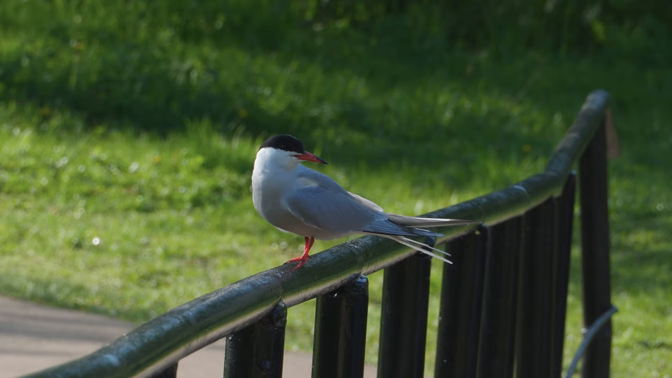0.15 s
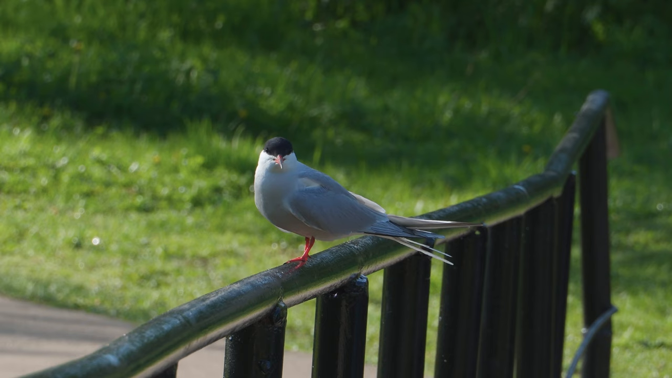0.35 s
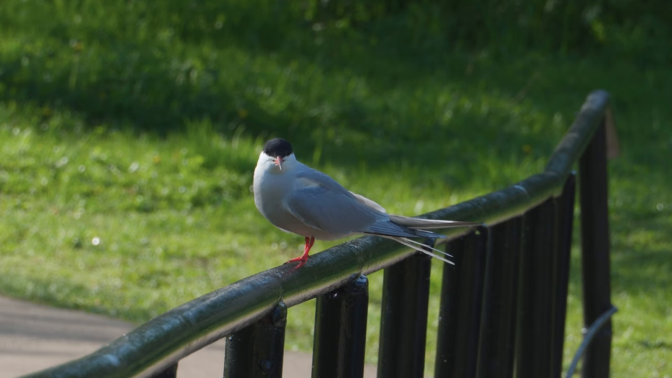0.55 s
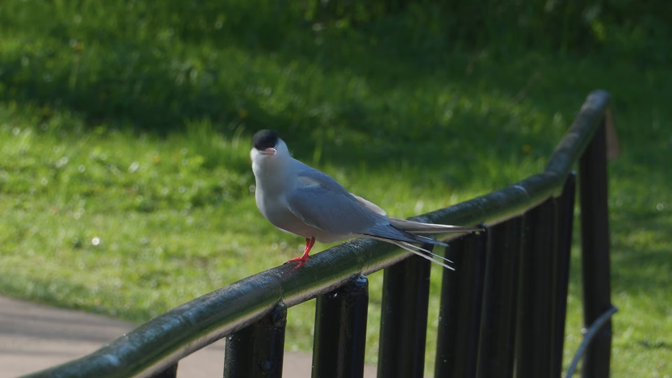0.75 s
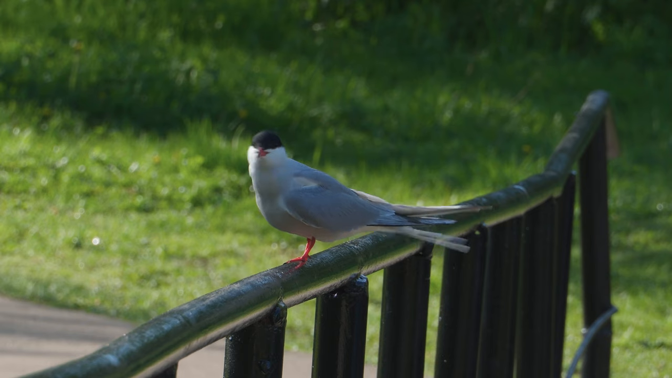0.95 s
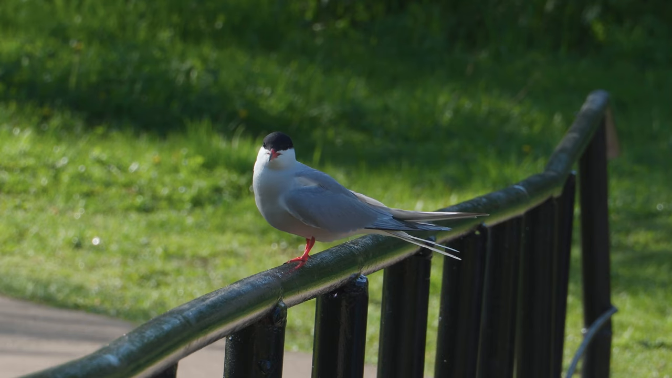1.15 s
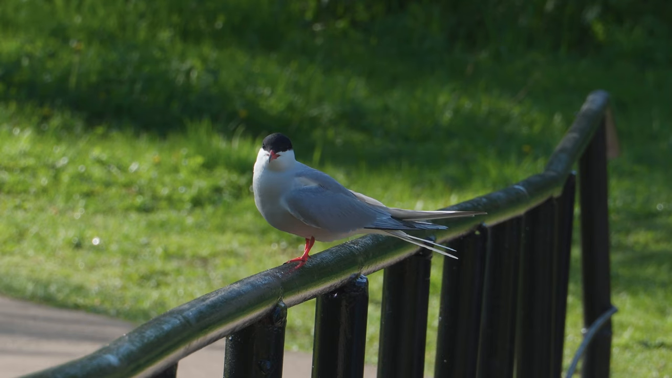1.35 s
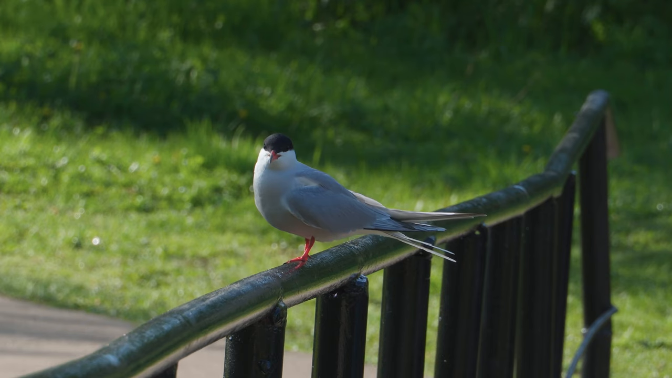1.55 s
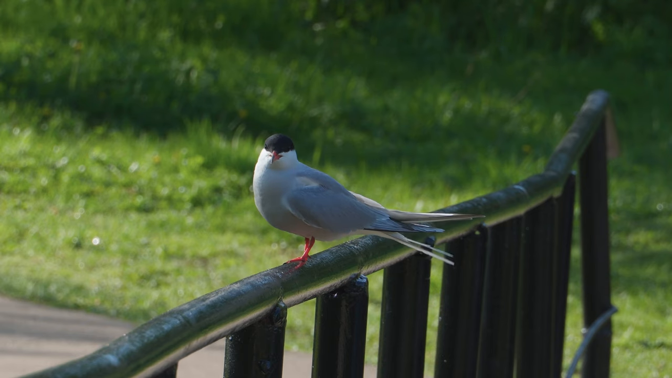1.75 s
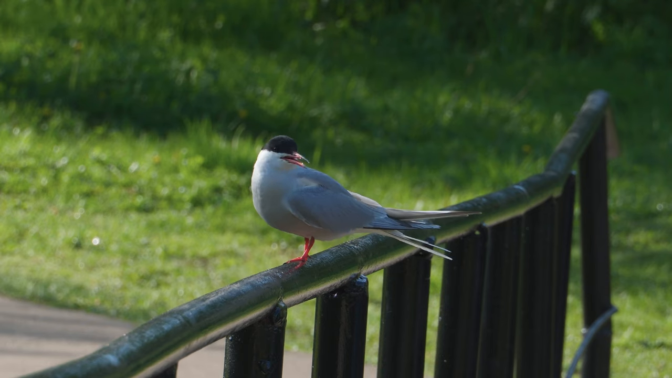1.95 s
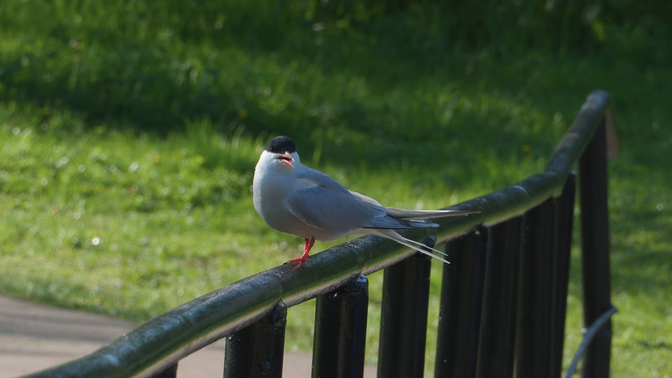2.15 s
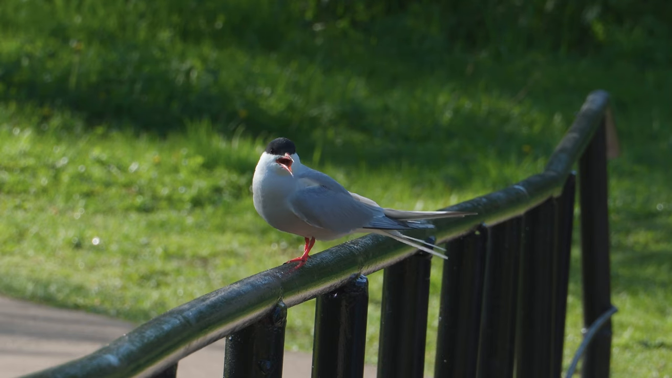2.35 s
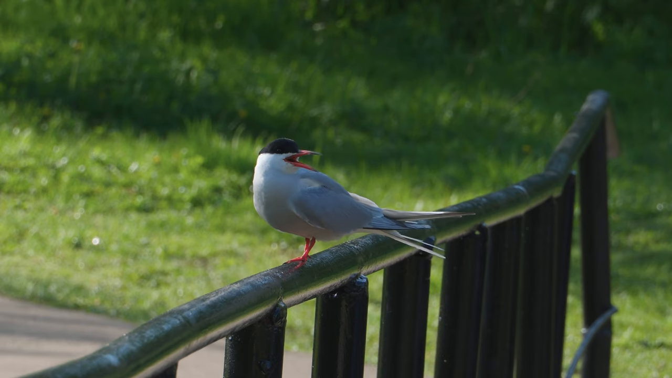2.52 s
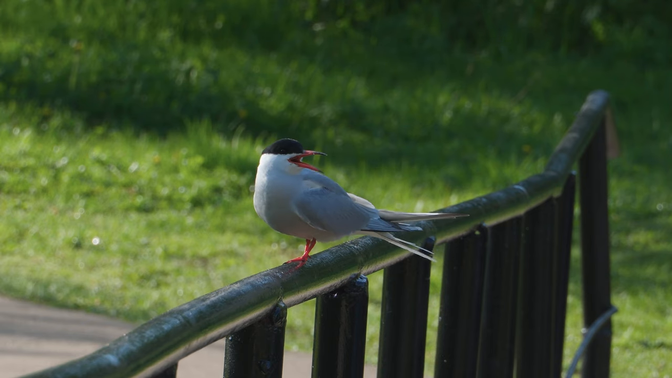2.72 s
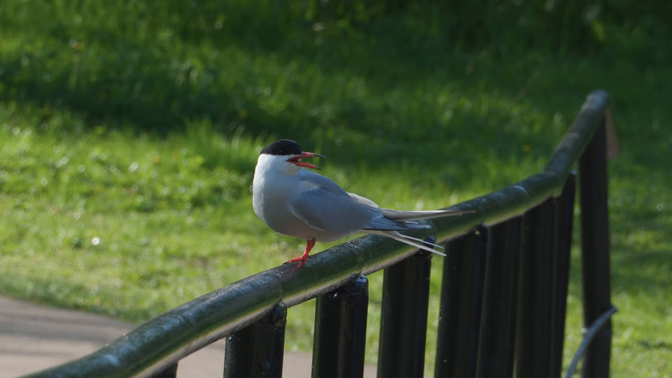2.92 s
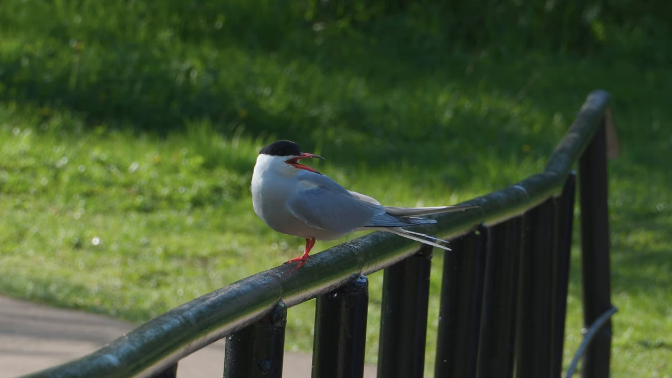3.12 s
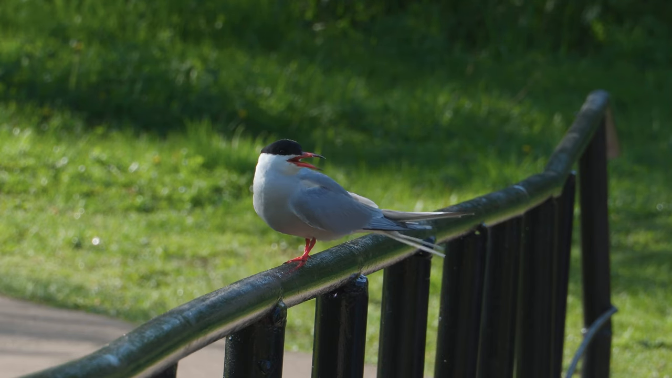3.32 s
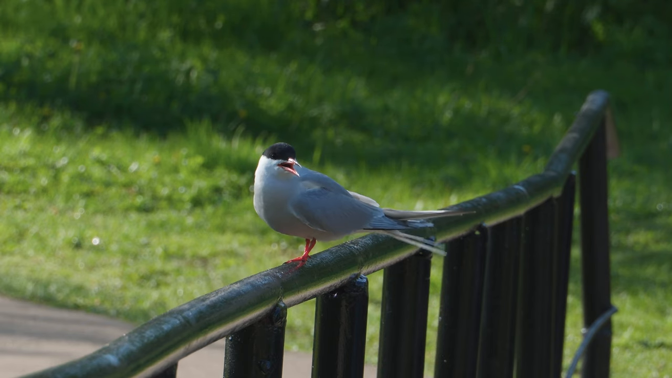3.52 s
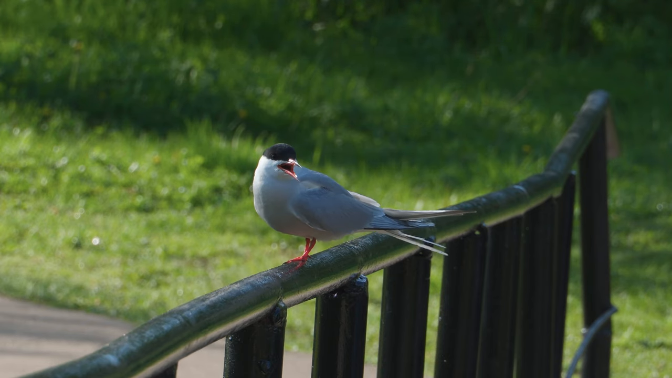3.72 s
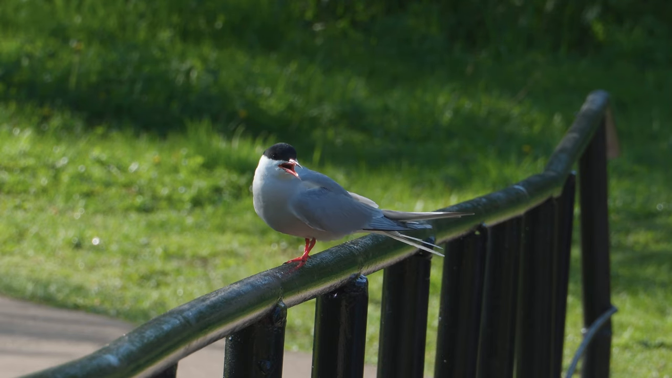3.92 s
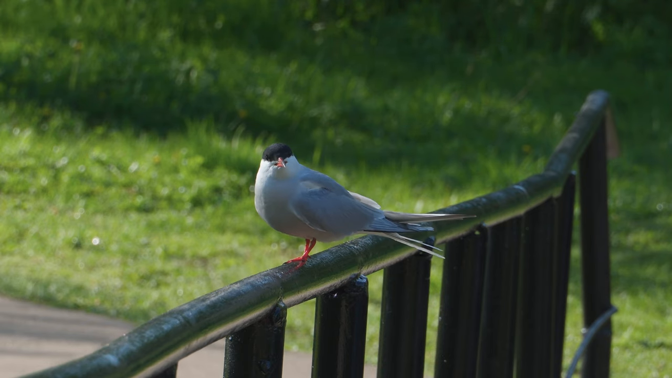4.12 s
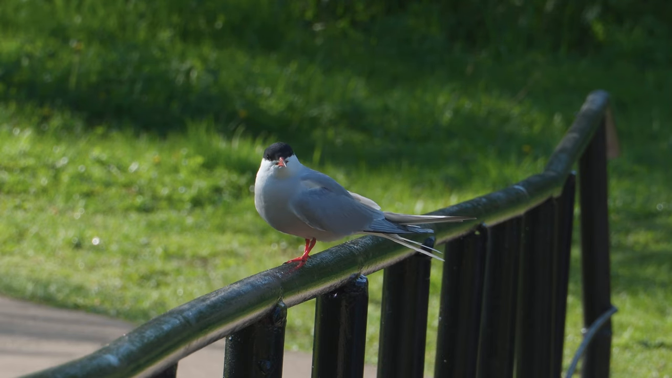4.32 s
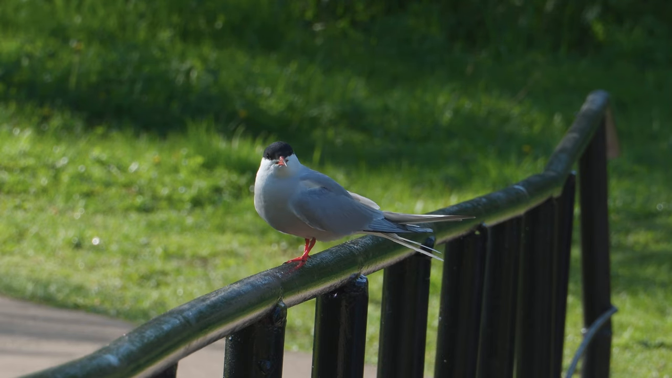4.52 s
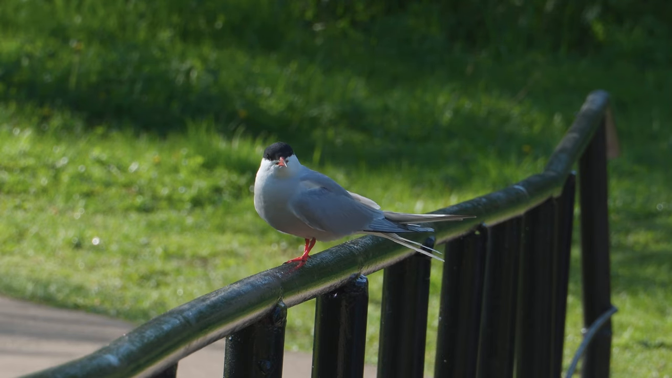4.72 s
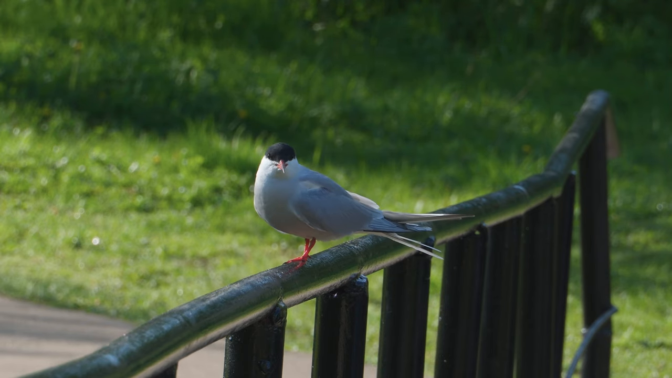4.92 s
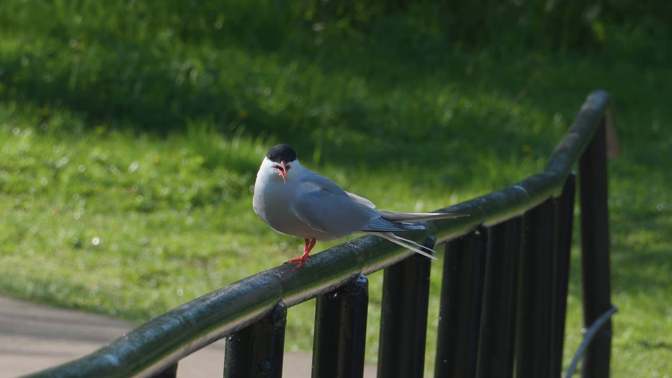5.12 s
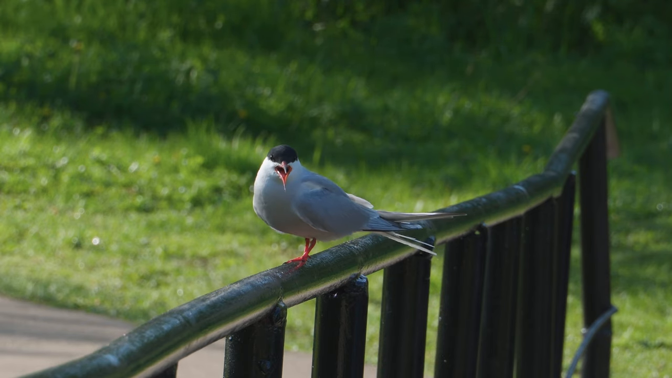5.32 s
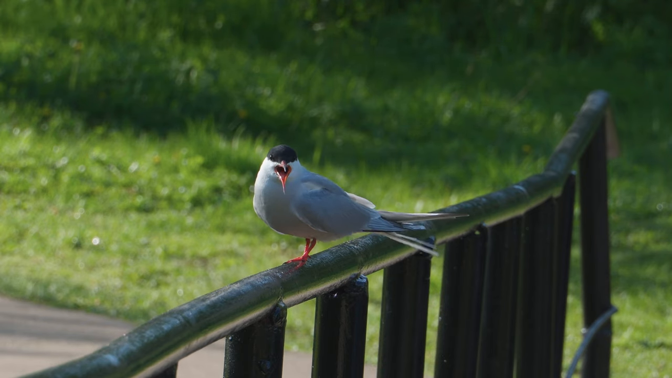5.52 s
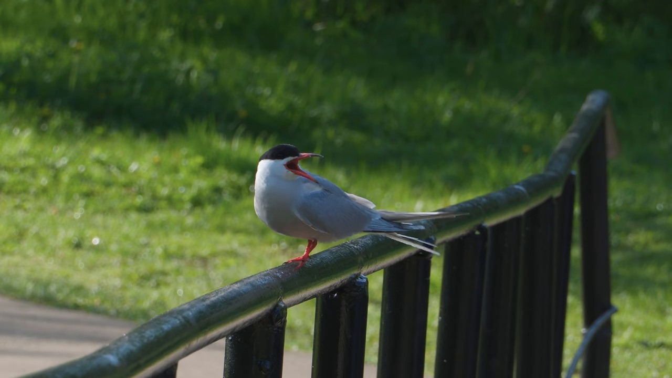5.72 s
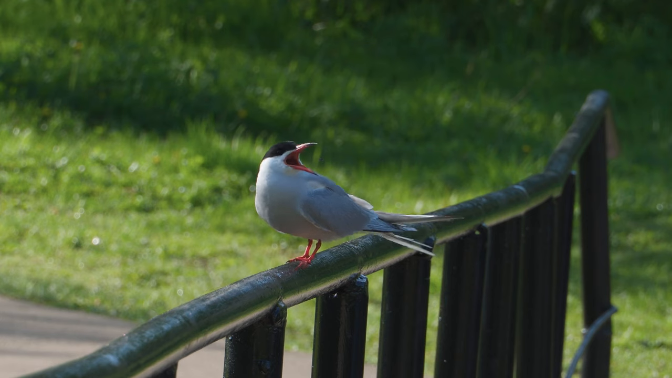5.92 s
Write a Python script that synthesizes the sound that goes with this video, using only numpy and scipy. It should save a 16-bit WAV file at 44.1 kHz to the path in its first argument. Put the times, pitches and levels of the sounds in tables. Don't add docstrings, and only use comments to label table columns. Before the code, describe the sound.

Quiet waterside park: gentle lapping with small plops and ticking droplets, steady hiss and faint low hum, a distant warbler and blurred twitter. After two seconds a close tern breaks into rapid harsh chatter, each throbbing rasp cracking into a short falling yelp, about seven a second. It stops at four seconds, leaving water, then a second bout starts and grows louder to the end. Fairly close microphone, light open-air echo.

```python
import sys
import numpy as np
from scipy import signal
from scipy.fft import rfft, irfft
from scipy.io import wavfile
from scipy.ndimage import uniform_filter1d, map_coordinates

SR = 44100
rng = np.random.default_rng(int(sys.argv[2]) if len(sys.argv) > 2 else 0)


def rack_gain(trim_db):
    fader = np.asarray(trim_db, float)
    return 10 ** (fader / 20)


def materialize(psi):
    bounded = np.clip(np.atleast_2d(psi).T, -1, 1)
    quanta = np.round(bounded * 32767).astype(np.int16)
    wavfile.write(sys.argv[1], SR, quanta)


N = 267246
TIME = np.arange(N) / SR
TOP_HZ = 15830


def unit(x):
    return x / np.sqrt(np.mean(x ** 2) + 1e-20)


def along(points, hz):
    f, v = np.transpose(points)
    return np.interp(np.log(hz + 1), np.log(f + 1), v)


def wobble(rate, size=N):
    knots = rng.standard_normal(int(size * rate / SR) + 4)
    return map_coordinates(knots, [np.arange(size) * rate / SR])


def rush(spectrum, patchy_db):
    hz, _, z = signal.stft(rng.standard_normal(N + 512), SR, nperseg=512)
    field = uniform_filter1d(rng.standard_normal(z.shape), size=5, axis=0)
    field = uniform_filter1d(field, size=6, axis=1)
    z = z * rack_gain(patchy_db * unit(field) + along(spectrum, hz)[:, None])
    return unit(signal.istft(z, SR, nperseg=512)[1][:N])


def add(track, s, sound):
    part = track[round(s * SR):][:len(sound)]
    part += sound[:len(part)]


def tone(hz, multiple=1, phase=0):
    return np.sqrt(2) * np.sin(2 * np.pi * multiple * np.cumsum(hz) / SR + phase)


def bubble(hz, life, rise=0.285):
    u = np.arange(0, 4, 1 / (life * SR))
    swell_and_fade = u * 4 * np.exp(1 - u * 4)
    return swell_and_fade * np.sin(2 * np.pi * hz * life * (u + rise * u * u / 2))


# start_s [s], lapping_db [dB], hiss_db [dB]
WATER_LEVELS = [
    (0.0, -36.5, -57),
    (5.32, -36, -56),
    (6.06, -35.5, -52),
]
# pitch_hz [Hz], level_db [dB per Hz]
LAPPING_COLOUR = [(88, -60), (150, -10), (470, -4), (532, -5.5), (858, -4.5), (1120, -5), (1410, -7),
                  (4760, -19.5), (6000, -24.5), (7800, -67), (13200, -120)]
# pitch_hz [Hz], level_db [dB per Hz]
HISS_COLOUR = [(2500, -11), (4000, -3), (5000, -2), (6500, 6), (8700, 9), (9600, 0), (10500, -6.5),
               (12500, 1.5), (15000, -6.5), (17000, 2.5)]


def lapping_and_hiss():
    small = np.zeros(N)
    for s, pitch, cycles, size in rng.random((900, 4)):
        hz = 350 * 9 ** pitch
        level = (1.02 - size) ** -.3 * (hz / 1000) ** -.2
        add(small, s * N / SR, level * bubble(hz, (0.97 + 7 * cycles) / hz))
    s, wash_db, hiss_db = np.transpose(WATER_LEVELS)
    wash = rush(LAPPING_COLOUR, patchy_db=2.14) + rack_gain(-14.5) * unit(small)
    wash = rack_gain(np.interp(TIME, s, wash_db) + 0.4 * wobble(9)) * wash
    hiss_level = rack_gain(np.interp(TIME, s, hiss_db) + 3 + .8 * wobble(40))
    return wash + hiss_level * rush(HISS_COLOUR, patchy_db=.4)


# pitch_hz [Hz], level_db [dB per Hz]
TRAFFIC_COLOUR = [(12, -21), (20, -14), (92, 10), (130, -58), (250, 9.5), (320, -13), (550, -120)]
# pitch_hz [Hz], level_db [dB]
MACHINE_HUM = [
    (104, -64),
    (156, -78),
    (306, -53.5),
]


def town():
    hum = sum(rack_gain(db + 0.34 * wobble(4.6)) * tone(hz + 2.17 * wobble(6.5)) for hz, db in MACHINE_HUM)
    return hum + rack_gain(-52.0) * rush(TRAFFIC_COLOUR, patchy_db=-0.3)


# start_s [s], level_db [dB]
TWITTER_LEVELS = [(.3, -68), (.4, -59), (.7, -53), (1, -45), (1.3, -48), (1.6, -50), (1.9, -59), (2.2, -73)]


def twitter():
    flock = sum(rack_gain(2 * wobble(90)) * tone(3650 * (1 + .07 * wobble(110))) for _ in range(7))
    return rack_gain(np.interp(TIME, *np.transpose(TWITTER_LEVELS), right=-90)) * unit(flock)


# start_s [s], peak_db [dB], pitch_hz [Hz]
WATER_TICKS = [(0.3935, -30, 5800), (.5785, -31, 5200), (1.4252, -28, 5640), (1.9749, -36, 5800),
               (2.074, -36, 7500), (4.0741, -34, 6130), (5.7434, -30, 12500), (5.7743, -31, 7800),
               (5.906, -33, 8000), (5.341, -38, 5000)]
# start_s [s], peak_db [dB]
MORE_WATER_TICKS = [(0.1266, -32), (0.393, -27), (0.4309, -44), (0.4484, -36), (0.4868, -41), (0.5107, -42),
                     (0.5501, -36), (0.5776, -32), (0.6514, -44), (0.6574, -41), (0.7776, -43), (0.8145, -37),
                     (0.8614, -45), (0.8889, -45), (0.9338, -39), (1.053, -37), (1.1732, -31), (1.2062, -30),
                     (1.2321, -42), (1.2875, -30), (1.3488, -41), (1.4147, -33), (1.5374, -42), (1.5424, -36),
                     (1.5628, -27), (1.5893, -40), (1.6043, -31), (1.7, -41), (1.8846, -32), (1.9609, -46),
                     (4.0668, -35), (4.0952, -32), (4.1292, -32), (4.208, -29), (4.2155, -34), (4.2738, -43),
                    (4.3212, -42), (4.3407, -38), (4.3571, -29), (4.3866, -42), (4.453, -31), (4.4953, -40),
                    (4.5632, -34), (4.63, -40), (4.6435, -30), (4.6659, -37), (4.8181, -32), (4.8585, -42),
                    (4.9643, -33), (5.0161, -36)]


def spray():
    out = np.zeros(N)
    for s, db, hz in WATER_TICKS:
        add(out, s, rack_gain(db + 3) * bubble(hz, 2.5 / hz, rise=.05))
    for s, db in MORE_WATER_TICKS:
        hz = 8500 * rng.uniform(.92, 1.12)
        add(out, s + .001, rack_gain(db - .5) * bubble(hz, 3.2 / hz, rise=.05))
    for s, pitch, size in rng.random((500, 3)):
        hz = 4500 * 3 ** pitch
        add(out, s * N / SR, rack_gain(-46) * (1.02 - size) ** -.3 * bubble(hz, 2.8 / hz))
    return out


# start_s [s], peak_db [dB], pitch_hz [Hz], life_s [s]
WATER_PLOPS = [(0.162, -30, 1120, 0.026), (0.361, -31.5, 756, 0.017), (0.449, -32.5, 1150, 0.016),
               (0.711, -31.5, 815, 0.023), (0.968, -30, 553, 0.02), (1.32, -24, 955, 0.012),
               (1.549, -22, 844, 0.0091), (1.829, -28, 1170, 0.01), (4.004, -27.5, 950, 0.016),
               (4.356, -18, 854, 0.013), (4.432, -28, 797, 0.02), (4.932, -32.5, 800, 0.015),
               (5.039, -41, 1080, 0.011)]
# start_s [s], peak_db [dB], pitch_hz [Hz], life_s [s]
WATER_GLUGS = [
    (0.989, -32.5, 307, 0.048),
    (3.249, -34, 253, 0.022),
    (4.018, -32.5, 304, 0.037),
    (5.658, -22.5, 403, 0.006),
    (5.699, -31.5, 534, 0.019),
    (6.0, -37, 600, 0.019),
]
# start_s [s], peak_db [dB], pitch_hz [Hz], life_s [s]
WATER_DRIPS = [(0.579, -22, 3580, 0.002), (0.595, -29, 1970, 0.0093), (0.718, -30.5, 1970, 0.009),
               (0.789, -33, 3850, 0.0043), (1.0216, -30.5, 2270, 0.0078), (1.1333, -35, 2380, 0.005),
               (1.501, -30, 3440, 0.0028), (4.6644, -47, 2160, 0.004), (5.1053, -29.5, 1900, 0.012),
               (5.1706, -25, 1800, 0.0067)]


def plops():
    out = np.zeros(N)
    for s, db, hz, life in WATER_PLOPS + WATER_GLUGS + WATER_DRIPS:
        add(out, s - .002, rack_gain(db) * bubble(hz * 0.907, life))
    return out


# start_s [s], length_s [s], top_hz [Hz], level_db [dB], higher_partials_db [dB]
WATER_BIRD_CALLS = [
    (.172, .064, 1345, -35, -22),
    (1.825, .052, 1385, -37, -15),
    (4.158, .034, 1230, -45, -2),
    (5.412, .03, 1010, -29, -15),
    (5.812, .036, 1500, -23, -10),
    (6.004, .024, 1400, -25, -10),
]


def water_birds():
    out = np.zeros(N)
    for s, length, top_hz, db, high_db in WATER_BIRD_CALLS:
        u = np.linspace(0, 1, round(length * SR))
        hz = top_hz * (1 - .9 * (u - .52) ** 2)
        high = sum(tone(hz, multiple=m) * 3 / m for m in range(3, 7))
        stack = tone(hz) + rack_gain(-0.3) * tone(hz, multiple=2) + rack_gain(high_db) * high
        add(out, s, rack_gain(db) * np.sin(np.pi * u) ** 0.98 * stack)
    return out


FLUTTER_DB = 4

# start_s [s], level_db [dB], held_hz [Hz], held_s [s], held_to_hz [Hz]
WARBLER_NOTES = [(0.28, -45, 5240, 0.045, 4730), (.568, -42, 5260, 0.021, 5650),
                 (0.854, -40.5, 4540, 0.053, 4640), (1.159, -39.5, 5160, 0.0024, 5000),
                 (1.468, -43, 4530, 0.002, 4300), (1.739, -41, 4700, 0.002, 4470),
                 (2.028, -42.5, 4560, 0.057, 4620), (2.348, -38, 4540, 0.054, 4600),
                 (2.663, -42, 4400, 0.083, 4580), (2.99, -38, 4800, 0.0057, 4600),
                 (3.298, -41, 5800, 0.011, 5760), (3.61, -45, 4900, 0.0044, 4700),
                 (3.884, -39.5, 4500, 0.002, 4450)]


def warbler():
    out = np.zeros(N)
    for s, db, held_hz, held, to_hz in WARBLER_NOTES:
        t = np.arange(0, held + .04, 1 / SR)
        dive = .011 if held < .003 else .014
        held_end, end = dive + .002 + held, .04 + held
        hz = np.interp(t, [0, dive, held_end, end], [6850, held_hz, to_hz, .72 * to_hz])
        hz = uniform_filter1d(hz, size=260, mode="nearest")
        shape_db = np.interp(t, [0, .004, dive - .002, held_end, end],
                             [-12, -2, 0, -1.5 - .006 / held, -4 - .12 / held])
        flutter_db = FLUTTER_DB * wobble(186, size=SR // 4)[:len(t)]
        add(out, s, rack_gain(db + shape_db + flutter_db) * tone(hz))
    return out


# start_s [s], length_s [s], from_hz [Hz], to_hz [Hz], level_db [dB]
FAR_WHISTLES = [(.39, .07, 4130, 4130, -51), (.47, .12, 4150, 4100, -55), (.36, .03, 4100, 3400, -52),
                (.71, .025, 3900, 3300, -50), (.545, .025, 3800, 3400, -52), (.75, .04, 3850, 3700, -55),
                (1.09, .06, 3700, 3750, -50), (1.26, .07, 3750, 3300, -50), (1.76, .05, 3400, 3600, -50),
                (4.885, .075, 4650, 4900, -51), (4.96, .065, 4900, 4650, -52),
                (4.865, .08, 5550, 5650, -57), (4.96, .065, 5650, 5600, -58), (4.765, .06, 430, 490, -39)]


def whistles():
    out = np.zeros(N)
    for s, length, from_hz, to_hz, db in FAR_WHISTLES:
        u = np.linspace(0, 1, round(length * SR))
        level = rack_gain(db + FLUTTER_DB * wobble(108, size=len(u))) * np.sin(np.pi * u) ** .5
        hz = (from_hz + (to_hz - from_hz) * u) * (1 + 0.012 * wobble(152, size=len(u)))
        add(out, s, level * tone(hz))
    return out


# pitch_hz [Hz], level_db [dB]
THROAT_COLOUR = [(900, 1.5), (1250, -2.5), (1700, -3), (1950, 8.5), (2170, -16), (2420, 7), (3500, 3.5),
                 (4550, -0.5), (5250, -0.5), (6000, -12.5), (8700, -11.5), (9600, -23), (12400, -22.5),
                 (15800, -28.5)]
# pitch_hz [Hz], width_hz [Hz], level_db [dB]
SIDE_POCKETS = [
    (1427, 97, -13),
    (3010, 170, -8),
    (3900, 166, -11),
    (7700, 160, -6),
    (10500, 200, -21),
]


def throat(hz):
    pockets_db = sum(db * np.exp(-((hz - centre) / width) ** 2) for centre, width, db in SIDE_POCKETS)
    return rack_gain(along(THROAT_COLOUR, hz) + pockets_db)


# reopened_s [s], dip_db [dB]
SYRINX_CATCHES = [(2.142, 8), (2.153, 30), (2.1658, 30), (2.267, 6), (2.278, 2), (2.289, 3), (2.301, 30),
                  (2.4, 8), (2.409, 10), (2.42, 6), (2.434, 30), (2.539, 6), (2.549, 5.5), (2.561, 4),
                  (2.572, 4), (2.585, 29), (2.694, 4), (2.705, 2), (2.716, 5), (2.729, 1), (2.74, 23),
                  (2.8844, 24), (2.897, 13), (3.0418, 25), (3.184, 4), (3.197, 8), (3.206, 17), (3.335, 5),
                  (3.347, -2), (3.356, 13), (3.5136, 3), (3.658, 5), (3.787, 11), (3.799, 4), (3.811, 11),
                  (3.958, 2), (3.97, 7), (5.228, 4), (5.241, 1), (5.252, 4), (5.2638, 7), (5.417, 11),
                  (5.532, -1), (5.544, 4), (5.5551, 4), (5.708, 26), (5.799, 4), (5.81, 2), (5.821, 2),
                  (5.832, 0), (5.845, 4), (5.8562, 12), (5.869, 23), (5.9654, 4), (5.984, 0.5), (5.996, 4),
                  (6.011, 3), (6.021, 4), (6.0327, 20), (6.046, 6),
                  (2.853, 4), (2.86, 4), (2.875, 6), (3.019, 5), (3.031, 4), (5.371, 4), (5.381, 11),
                       (5.394, 5), (5.404, 5), (5.513, 3), (5.653, 4), (5.663, 1), (5.671, 0), (5.685, 2),
                       (5.695, 3)]


def throbs(start, brk, dip_db):
    usual_dip_db = 2
    catches = sorted(SYRINX_CATCHES)
    beats = [row for row in catches if start < row[0] < brk] + [(brk + .002, dip_db)]
    lead = beats[0][0] - .0128 * np.cumsum(.92 ** np.arange(9))[::-1]
    rows = [(s, usual_dip_db) for s in lead if s > start + .007] + beats[:1]
    for (a, _), (b, dip) in zip(beats, beats[1:]):
        steps = max(round((b - a) / .0145), 1)
        rows += [(a + (b - a) * i / steps, usual_dip_db) for i in range(1, steps)]
        rows.append((b, dip))
    return np.transpose(rows)


def call_pitch(t, rasp, yelp, crack_db, later):
    start, open_hz, held_hz = rasp[:3]
    brk, length, top_hz = yelp[:3]
    opening_s, end_hz = (.013 if later else .02), 1150
    rasp_s = [start, min(start + opening_s, brk - .008), brk - .006 - .15 * (brk - start), brk - .0003]
    rasp_hz = [open_hz, 1.005 * held_hz, 1.035 * held_hz, 1.09 * held_hz]
    yelp_s = [brk, brk + 0.0058, brk + .5 * length, brk + .81 * length, brk + length - .001]
    overshoot_hz = top_hz * (1 + 0.015 * crack_db)
    yelp_hz = [overshoot_hz, top_hz, 0.99 * top_hz, max(.885 * top_hz, end_hz), end_hz]
    return np.interp(t, rasp_s + yelp_s, rasp_hz + yelp_hz)


def call_loudness(t, rasp, yelp, crack_db):
    start, _, _, rasp_db, swell = rasp
    brk, length, _, yelp_db, dip_db = yelp
    end = brk + length
    s, dip = throbs(start, brk, dip_db)
    rasp_peaks_db = rasp_db - 13.5 * np.exp((start - s) / swell) + 7 * (s - brk)
    db = np.r_[rasp_peaks_db[:-1], yelp_db]

    middle = (s[1:] + s[:-1]) / 2
    late = np.maximum(s[1:] - .003, middle)
    shut = np.r_[np.where(dip[1:] > 11, late, middle), brk + 0.96 * length]
    shut_db = db - np.r_[np.minimum(dip[1:], 11), 12.5]
    knots = np.ravel([s, shut], "F")
    knots_db = np.ravel([db, shut_db], "F")
    onset = start + .001
    size = np.interp(t, np.r_[onset - .0065, onset, knots, end, end + .002, end + .008],
                     rack_gain(np.r_[-62, db[0] - 12, knots_db, yelp_db - 13, -58, -120]))

    stops = shut[:-1, None]
    leak = rack_gain(-2 * np.clip(dip[1:, None] - 11, 0, 15))
    gate = np.clip(np.maximum((stops - .0015 - t) / .003, (t - stops - .0018) / .0006), leak, 1)
    crack = rack_gain(-2 + (1 + crack_db) * np.exp(-((t - brk - .0025) / .0018) ** 2))
    size = crack * uniform_filter1d(size, size=30) * np.prod(gate, axis=0)
    size = size * rack_gain(-7 * np.exp(-((t - brk) / .0006) ** 2))

    since = t - np.r_[stops[:, 0] + .002, brk][:, None]
    strength = np.r_[1 - leak[:, 0], .2][:, None]
    pop = np.sum((since > 0) * np.exp(-abs(since) / .003) * strength, axis=0)
    cycle = np.interp(t, knots, np.arange(len(knots)) * np.pi)
    return size, cycle, pop


def brightness(t, k, rasp, yelp, cycle, raspy, chaos_db, later):
    start, swell = rasp[0], rasp[4]
    brk, length, top_hz = yelp[:3]
    end, low_yelp = brk + length, top_hz < 1553
    swing_db = (3 + 4 * later) * raspy * (np.cos(cycle) - 0.15)
    db = swing_db * ((k == 3) + .4 * (k == 4) * (1 + later))
    fading = np.clip((t - brk) / (end - brk), 0, 1) ** 2
    db = db - (2.5 * fading + 0.5 * np.exp(-abs(t - start) / swell)) * np.log2(k)
    db = db + 16 * (k == 3) * np.exp(-((t - end + 0.00043) / .0025) ** 2)
    db = db + later * (-3 * (k == 2) * raspy + 1.5 * (k > 5))
    db = db - 5 * (k > (2 if later else 3)) * (1 - raspy) * low_yelp
    db = db - 0.18 * chaos_db * (k == 2)
    db = db - 1 * (k == 2) * raspy * np.exp(-abs(t - start) / 0.019)
    return db - 5.5 * (k == 3) * np.exp(-((t - start) / 0.013) ** 2)


def breath(hz, later):
    puffs = rfft(rng.standard_normal(len(hz)) * (1.6 + tone(hz)))
    band = np.fft.rfftfreq(len(hz), 1 / SR)
    shade = 1 + later * (band / 14000) ** 2
    low_cut = 1 + (1600 / (band + 1)) ** 4
    return unit(irfft(puffs * throat(band) ** .72 / shade / low_cut, len(hz)))


# start_s [s], opening_hz [Hz], held_hz [Hz], level_db [dB], swell_s [s]
TERN_RASPS = [(2.017, 1200, 1174, -24, 0.051), (2.138, 1176, 1161, -18, 0.016),
              (2.26, 1075, 1173, -20.5, 0.0083), (2.392, 1133, 1193, -20, 0.0053),
              (2.535, 1093, 1211, -18, 0.0051), (2.683, 1010, 1187, -18, 0.013),
              (2.834, 954, 1190, -17.5, 0.015), (2.996, 934, 1180, -18, 0.017),
              (3.17, 1110, 1174, -17.5, 0.0079), (3.313, 987, 1140, -17.5, 0.034),
              (3.46, 954, 1172, -19.5, 0.014), (3.612, 916, 1167, -18.5, 0.011),
              (3.766, 900, 1158, -16.5, 0.011), (3.931, 919, 1168, -18, 0.014),
              (5.11, 1081, 1170, -22, 0.018), (5.2255, 1077, 1191, -20, 0.0059),
              (5.366, 1083, 1191, -16.5, 0.014), (5.504, 1003, 1210, -18, 0.009),
              (5.642, 993, 1223, -16.5, 0.012), (5.792, 1046, 1262, -11, 0.04),
              (5.962, 1150, 1271, -15.5, 0.0044)]
# register_break_s [s], length_s [s], top_hz [Hz], level_db [dB], dip_before_db [dB]
TERN_YELPS = [(2.031, 0.038, 1497, -22.5, 4), (2.172, 0.019, 1460, -23.5, 0),
              (2.307, 0.019, 1540, -22.5, -2), (2.454, 0.015, 1447, -24.5, 1), (2.598, 0.019, 1607, -20, 5),
              (2.75, 0.015, 1666, -16.5, 3), (2.9, 0.02, 1660, -16, 1), (3.0525, 0.02, 1716, -12, 2),
              (3.208, 0.025, 1666, -15.5, -4), (3.369, 0.022, 1604, -18.5, 2),
              (3.52, 0.019, 1654, -18.5, 0), (3.669, 0.023, 1637, -19, 2), (3.824, 0.023, 1634, -18.5, 8),
              (3.983, 0.019, 1620, -20, 3), (5.14, 0.0194, 1448, -23, -1.5), (5.283, 0.015, 1383, -24.5, 9),
              (5.431, 0.018, 1454, -21.5, 9.5), (5.569, 0.024, 1547, -24, 1.5),
              (5.722, 0.017, 1562, -24.5, 1), (5.881, 0.022, 1613, -19, 15), (6.055, 0.02, 1730, -15, 11.5)]
# middle_s [s], half_length_s [s], level_db [dB]
ROUGH_SPELLS = [(2.152, 0.0047, 1.5), (2.155, 0.0035, 0), (2.59, .003, 4), (2.728, 0.0038, 7.5),
                (3.183, 0.0035, 11), (3.197, 0.0029, 4), (3.341, .004, 3), (3.802, 0.0085, 2.5),
                (5.549, 0.0018, 11), (5.706, 0.016, 5.5), (5.845, 0.0089, 8), (5.861, 0.0046, 5),
                (5.873, 0.0076, 6), (5.841, 0.0089, 6), (5.887, 0.0067, 5), (5.732, 0.0065, -5),
                (5.437, .005, 5), (6.001, 0.0027, 0), (6.021, 0.0065, 13), (6.036, 0.0025, 14),
                (6.045, .003, 12)]


def tern():
    out = np.zeros(N)
    k = np.arange(1, 15)[:, None]
    for rasp, yelp in zip(TERN_RASPS, TERN_YELPS):
        start, rasp_db = rasp[0], rasp[3]
        brk, _, top_hz, yelp_db, _ = yelp
        later = start > 4.5
        t = start - .01 + np.arange(SR // 7) / SR
        crack_db = max(rasp_db - yelp_db, 0) * (top_hz > 1553)
        size, cycle, pop = call_loudness(t, rasp, yelp, crack_db)
        raspy = np.clip((brk - t) / .001, 0, 1)
        rough = raspy * np.clip((t - start) / .03, .35, 1)
        chaos_db = sum(db * np.exp(-((t - mid) / half) ** 4) for mid, half, db in ROUGH_SPELLS)
        size = size * rack_gain((.5 + .7 * rough) * wobble(1100, size=len(t)))

        effort = 1 + 0.18 * max(rasp_db + 18, 0)
        jitter = (.004 + .004 * chaos_db + .011 * rough * effort) * wobble(900, size=len(t))
        base = uniform_filter1d(call_pitch(t, rasp, yelp, crack_db, later), size=10)
        swing = 1 - raspy * .028 * np.cos(cycle + .3) + jitter
        hz = base * swing

        bright_db = brightness(t, k, rasp, yelp, cycle, raspy, chaos_db, later)
        smooth_hz = k * base * uniform_filter1d(swing, size=60, mode="nearest")
        gain = throat(smooth_hz) * rack_gain(bright_db) * (k * hz < TOP_HZ)
        gain = gain * rack_gain((-4 * later + 6 * raspy) * np.exp(-((k * hz - 4150) / 220) ** 2))
        gain = gain / np.sqrt(np.sum(gain[1:] ** 2, axis=0))
        partials = []
        for m in k[:, 0]:
            uneven_db = (.6 + .5 * (m > 2) + rough * min(m - 1, 4)) * wobble(350, size=len(t))
            partials.append(tone(hz, multiple=m, phase=rng.normal(-1.5, .6)) * rack_gain(uneven_db))
        voice = rack_gain(-.6 * chaos_db) * np.sum(gain * partials, axis=0)

        fray_db = 11 + 5 * np.cos(cycle - 1.3) + .05 * max(rasp_db + 19, 0)
        air_db = -24 + .72 * chaos_db + fray_db * rough + pop
        add(out, t[0], size * (voice + rack_gain(air_db) * breath(hz, later)))
    return out


# pitch_hz [Hz], time_to_fall_60_db_s [s]
ECHO_LENGTHS = [
    (500, 0.12),
    (3000, 0.69),
    (10000, 0.058),
]


def park(x):
    hz, t, z = signal.stft(rng.standard_normal(SR // 2), SR, nperseg=256)
    decay = rack_gain(-60 * t / along(ECHO_LENGTHS, hz)[:, None])
    tail = signal.istft(z * decay, SR, nperseg=256)[1]
    answer = rack_gain(-22.5) * np.pad(tail / np.linalg.norm(tail), (300, 0))
    answer[round(.034 * SR)] += rack_gain(-30)
    return signal.fftconvolve(x, answer)[:N]


def scene():
    background = lapping_and_hiss() + town() + spray() + plops()
    far = twitter() + water_birds() + warbler() + whistles()
    near = tern()
    echo = park(near + 1.9 * far)
    return (near + far + echo + background)[None]


def band_limit(x):
    return signal.sosfilt(signal.butter(12, 16800, fs=SR, output="sos"), x)


def record(dry):
    kept = irfft(rfft(dry) * (np.fft.rfftfreq(N, 1 / SR) < TOP_HZ), N)
    return band_limit(kept)


dry = scene()
out = record(dry)
materialize(out)
```